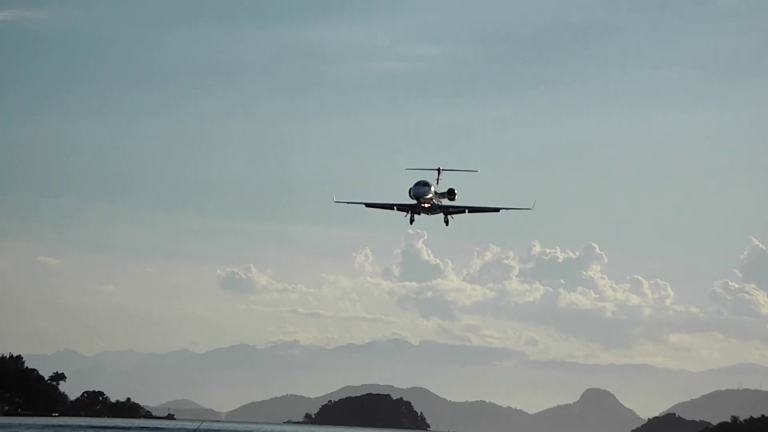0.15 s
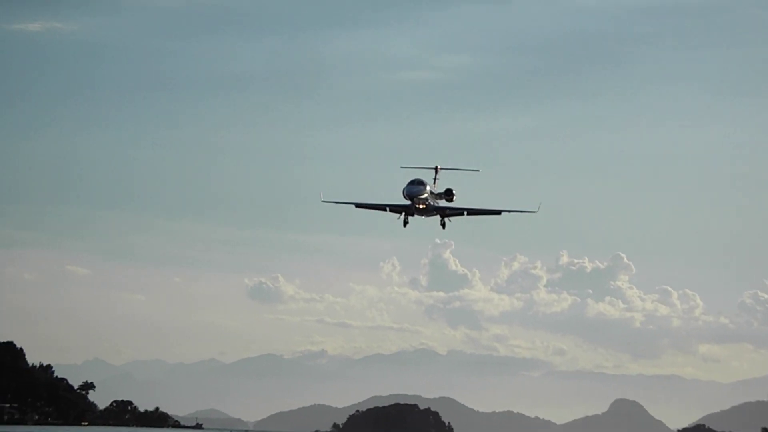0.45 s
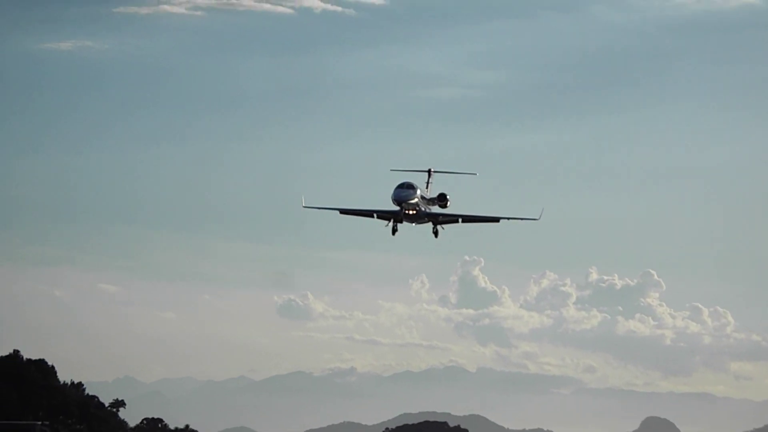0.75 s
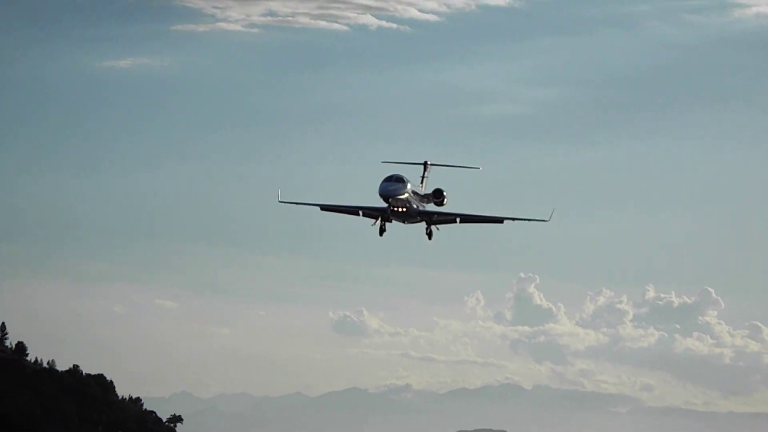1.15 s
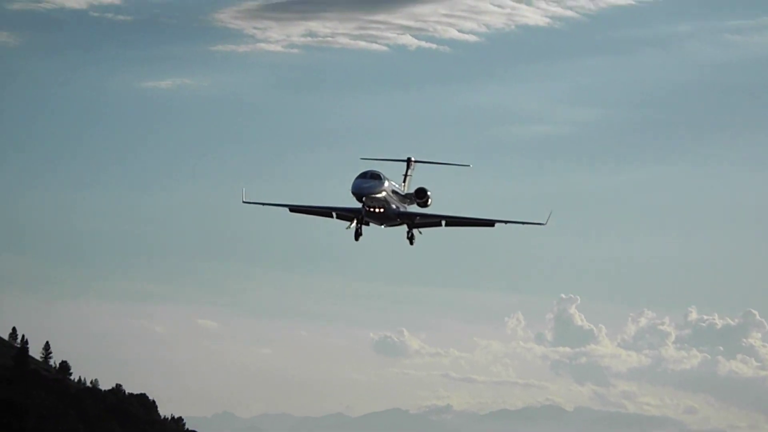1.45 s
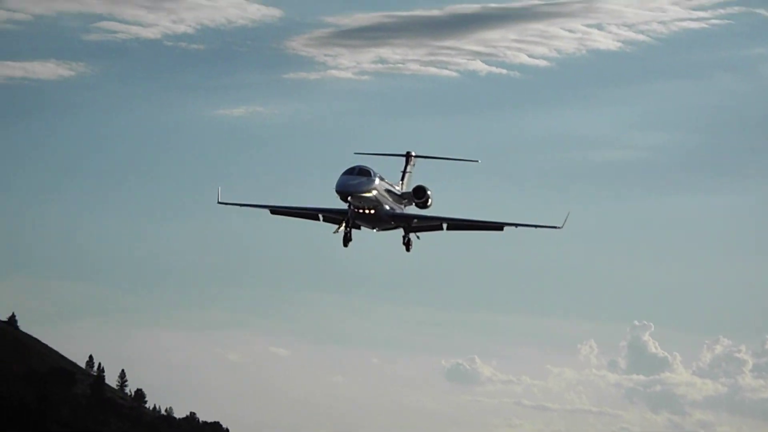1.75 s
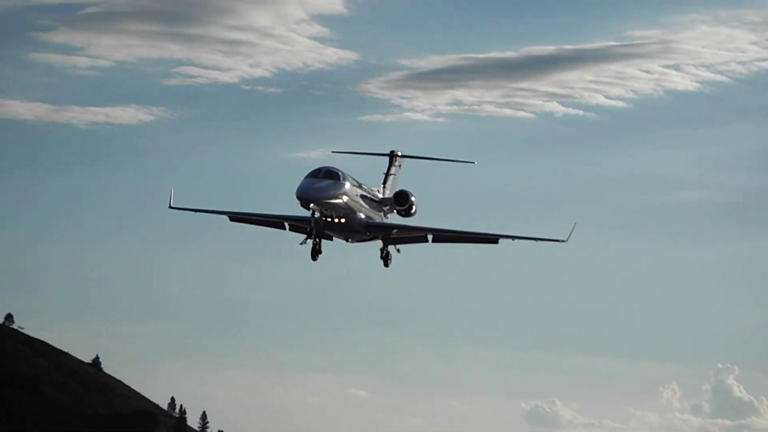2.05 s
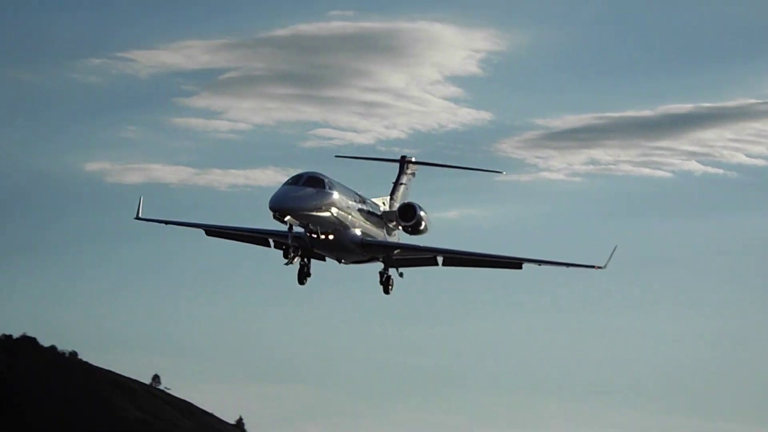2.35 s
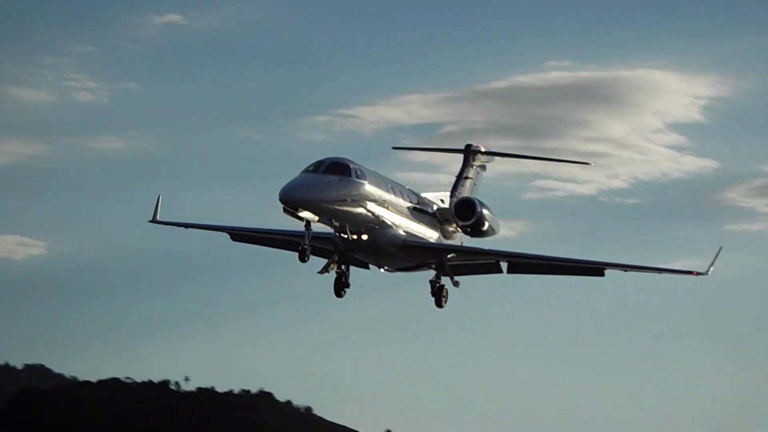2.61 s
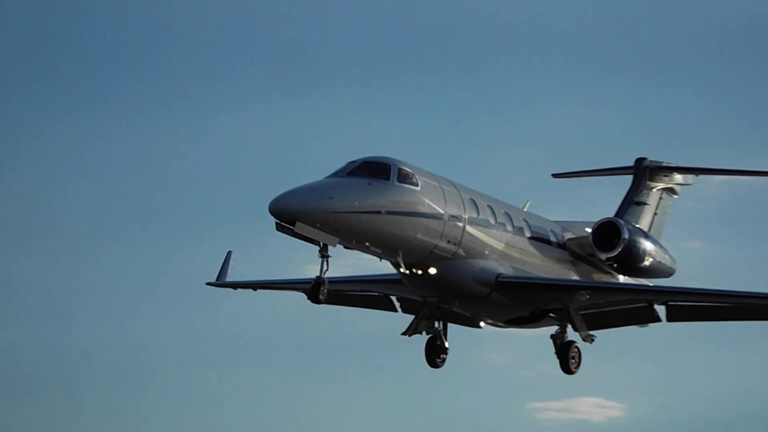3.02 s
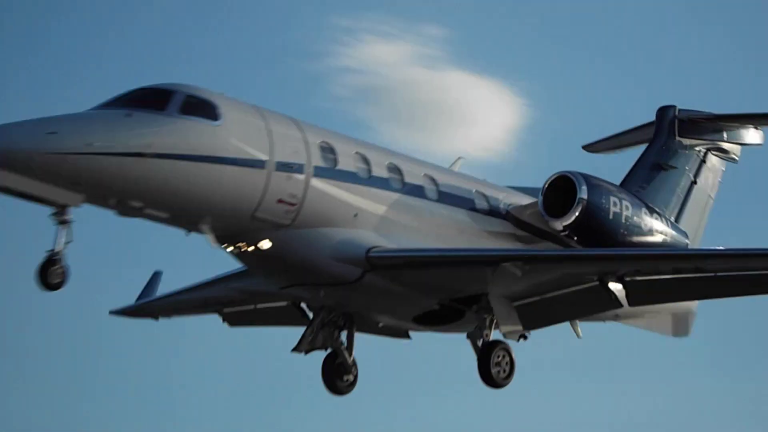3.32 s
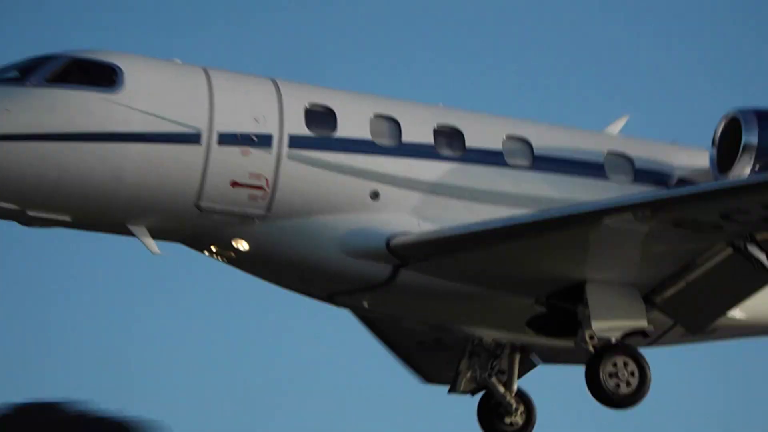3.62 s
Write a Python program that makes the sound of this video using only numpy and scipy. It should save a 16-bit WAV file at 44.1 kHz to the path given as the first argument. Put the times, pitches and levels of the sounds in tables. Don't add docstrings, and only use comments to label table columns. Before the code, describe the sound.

Small jet landing overhead outdoors: a steady rushing roar with sweeping hollow coloration, high turbine tones gliding down, then a brighter hissy pass with wavering whine, captured by overloaded camera microphones over barely audible surf.

```python
import sys
import numpy as np
from scipy import signal
from scipy.io import wavfile
from scipy.ndimage import uniform_filter1d, map_coordinates

SR = 44100
rng = np.random.default_rng(int(sys.argv[2]) if len(sys.argv) > 2 else 0)


def wrap_up_sound(samples):
    columns = np.atleast_2d(samples).T
    tamed = np.clip(columns, -1, 1)
    steps = np.round(tamed * 32767).astype(np.int16)
    wavfile.write(sys.argv[1], SR, steps)


def invert_db(x):
    u = np.asarray(x, float) / 20
    return 10 ** u


N = 166257

BOOSTER = 2.18
# time in seconds, fan blade rate in Hz, core rate in Hz.
SPOOLS = [(0, 2574, 4624), (.2, 2534, 4632), (.5, 2460, 4548), (1, 2292, 4466), (1.5, 2154, 4400),
          (1.92, 2047, 4328), (2.4, 1931, 4250), (2.9, 1832, 4150), (3.2, 1744, 4084), (3.4, 1706, 3964),
          (3.55, 1626, 3874), (3.66, 1575, 3733), (3.77, 1524, 3568)]


def unit(x):
    return x / np.sqrt(np.mean(x ** 2) + 1e-20)


def curves(rows):
    seconds, *columns = np.transpose(rows)
    t = np.arange(N) / SR
    return [np.interp(t, seconds, column) for column in columns]


def wobble(rate):
    knots = rng.standard_normal(int(N * rate / SR) + 4)
    return map_coordinates(knots, [np.arange(N) * rate / SR])


def along(points, hz):
    point_hz, value = np.transpose(points)
    return np.interp(np.log(hz + 1), np.log(point_hz + 1), value)


def shaped(x, gain_db):
    hz, seconds, bins = signal.stft(x, SR, nperseg=1024, noverlap=768)
    at = np.minimum((seconds * SR).astype(int), N - 1)
    bins = bins * invert_db(gain_db(hz[:, None], at))
    return signal.istft(bins, SR, nperseg=1024, noverlap=768)[1][:N]


def rush(spectrum, patchy_db):
    def gain_db(hz, at):
        patches = rng.standard_normal((len(hz), len(at)))
        patches = uniform_filter1d(patches, 12, 0)
        patches = uniform_filter1d(patches, 6, 1)
        return along(spectrum, hz) + patchy_db * unit(patches)

    return unit(shaped(rng.standard_normal(N), gain_db))


def tone(hz, flutter_db, rate, jitter_hz):
    heard_hz = hz + jitter_hz * wobble(60 + 2 * jitter_hz)
    phase = 2 * np.pi * np.cumsum(heard_hz) / SR
    flutter = invert_db(flutter_db * wobble(rate))
    return np.sqrt(2) * flutter * np.sin(phase) * (hz < SR / 2.5)


def off_ground(x):
    # time in seconds, extra ground path in ms, reflected share from 0 to 1.
    bounce = [(0, .75, .25), (.3, .82, .4), (.7, .93, .6), (1.1, 1.04, .5), (1.5, 1.18, .62),
              (1.9, 1.4, .4), (2.3, 1.68, .42), (2.7, 2.03, .42), (2.9, 2.29, .45), (3.1, 2.52, .3),
              (3.3, 3.1, .12), (3.77, 4.2, .08)]
    late_ms, share = curves(bounce)
    share = np.clip(share, 0, 1)
    dull = signal.filtfilt(*signal.butter(1, 9000, fs=SR), x)
    late_ms = late_ms + 0.023 * wobble(6.87)
    late = map_coordinates(dull, [np.arange(N) - late_ms * SR / 1000], order=3)
    return (x + share * late) / np.sqrt(1 + share ** 2)


def engine_roar():
    # time in seconds, intake level in dB, treble gain in dB near 12 kHz (below 0 is air loss),
    # exhaust level in dB.
    approach = [(0, -25.5, -12.5, -25), (.25, -20.5, -16.5, -22.5), (.5, -17.5, -20.5, -23.5),
                (.62, -12, -21, -23.5), (.8, -15.5, -13.5, -19), (.95, -12.5, -9, -18),
                (1.3, -12.5, -12.5, -17.5), (1.6, -13, -6, -21), (2, -14, -0.5, -20),
                (2.5, -17.5, 3.5, -19.5), (3, -16, 4, -20.5), (3.3, -17, 5.5, -20.5), (3.55, -19, 9, -25.5),
                (3.77, -23.5, 17.5, -20.5)]
    # frequency in Hz, density in dB per Hz.
    intake = [(1000, -31), (2500, -4), (4000, -3), (5500, 0), (6600, -5.5), (8100, -12.5), (11500, -26.5),
              (15600, -48.5)]
    # frequency in Hz, density in dB per Hz.
    exhaust = [(150, -49), (420, -14.5), (800, -5), (1350, -7), (1700, -2), (3000, -2.5), (6000, -5),
               (12000, -71)]
    intake_db, loss_db, exhaust_db = curves(approach)
    roar = invert_db(intake_db + 0.66 * wobble(14)) * rush(intake, patchy_db=1.5)
    roar = roar + invert_db(exhaust_db) * rush(exhaust, patchy_db=0.54)

    def path_db(hz, at):
        air_db = loss_db[at] * (hz / 11770.0) ** 1.61
        port_dip_db = -3 * np.exp(-((hz - 2840) / 340) ** 2)
        return air_db + port_dip_db

    return off_ground(shaped(roar, path_db))


def blade_tones():
    # fan multiple, core multiple, level in dB, best heard at in seconds,
    # beam width in seconds, pitch jitter in Hz.
    beams = [(1, 0, -30, .7, .65, 8), (1, 0, -29, 1.9, .3, 8), (0, 1, -28, 1.1, .7, 10),
             (0, 1, -28, 2.1, .35, 8), (BOOSTER, 0, -28, .75, .65, 60), (3, 0, -46, .3, .6, 8),
             (BOOSTER + 1, 0, -47, .3, .5, 8), (2, 1, -36, 2.6, 1.4, 14), (2, 1, -27, 3.7, .25, 40),
             (BOOSTER, 1, -43, 1.7, .95, 12), (3, 1, -68, 1, .4, 10), (BOOSTER + 1, 1, -60, 1.4, .45, 12),
             (BOOSTER + 2, 1, -63, 1.5, .55, 14), (BOOSTER + 3, 1, -64, 2.25, .35, 12),
             (1, 1, -18, 3.67, .2, 330)]
    fan, core = curves(SPOOLS)
    t = np.arange(N) / SR
    total = np.zeros(N)
    for fan_times, core_times, db, best_s, width_s, jitter_hz in beams:
        beam_db = np.maximum(-6 * ((t - best_s) / width_s) ** 2, -40)
        hz = fan_times * fan + core_times * core
        total += invert_db(db + beam_db) * tone(hz, flutter_db=2.6, rate=19, jitter_hz=jitter_hz)
    return total


def engines():
    return invert_db(0.29 * wobble(25.01)) * (engine_roar() + blade_tones())


def whine():
    # time in seconds, level in dB.
    whine_level = [(0, -43), (.9, -30), (1.9, -31), (2.05, -38), (2.11, -20), (2.25, -22), (2.33, -31),
                   (2.41, -15), (2.52, -29), (2.62, -18), (2.69, -30), (2.75, -19), (3.01, -24),
                   (3.18, -19), (3.29, -23), (3.4, -15), (3.56, -25), (3.77, -32)]
    fan, core = curves(SPOOLS)
    return invert_db(curves(whine_level)[0]) * tone(fan + core, flutter_db=2.2, rate=30, jitter_hz=5)


def airframe_hum():
    # time in seconds, frequency in Hz, level in dB.
    hum_glide = [(0, 483.5, -46), (.7, 476.3, -45), (1.5, 484.7, -48.5), (2.4, 479, -40),
                 (3.1, 469.7, -41.5), (3.4, 450.5, -50.5), (3.77, 427, -44)]
    hz, db = curves(hum_glide)
    return invert_db(db) * tone(hz, flutter_db=2.0, rate=11, jitter_hz=5.9)


def surf():
    # frequency in Hz, density in dB per Hz.
    wash = [(25, -37), (120, -16), (330, 4.5), (400, -6.5), (900, -6), (2000, -94)]
    # time in seconds, level in dB.
    wash_level = [(0, -44), (1.2, -43), (2, -51), (3.2, -51), (3.77, -42.5)]
    return invert_db(curves(wash_level)[0]) * rush(wash, patchy_db=2.5)


def port_wind():
    return invert_db(-76) * rush([(20, -4), (60, -8), (200, -43), (400, -92)], patchy_db=0.0)


def two_ports(near):
    # time in seconds, lean to the right from 0 to 1.
    lean = [(0, 0.7), (1.2, 0.73), (2.9, 0.2), (3.3, 0.16), (3.77, 0.3)]
    # frequency in Hz, side over mid in dB.
    side_over_mid = [(30, -14), (100, -24), (250, -30), (400, -18.5), (900, -34), (2500, -26.5),
                     (4400, -18), (8100, -13), (15000, -13)]
    scattered = signal.fftconvolve(near, rng.standard_normal(900) / 30)[:N]
    side = 0.9 * scattered - curves(lean)[0] * near
    side = shaped(side, lambda hz, at: along(side_over_mid, hz) + 0 * at)
    side = side + port_wind()
    return np.array([near + side, near - side])


def scene():
    return two_ports(engines() + whine() + airframe_hum() + surf())


def limiter(x):
    # time in seconds, duck depth in dB.
    peaks = [(0.879, 5), (0.98, 8), (1.095, 4.0), (1.154, 7), (1.191, 5.3), (1.249, 11), (1.296, 9),
             (1.323, 6.5), (1.56, 11), (1.632, 5.4), (1.701, 4), (1.819, 6), (1.84, 6), (1.996, -2),
             (2.054, 4.5), (2.237, 6), (2.331, 4), (2.444, 3.9), (2.515, 3), (2.818, 8), (2.858, 8.5),
             (2.889, 6.3), (3.022, 1), (3.087, 5.5), (3.143, 2), (3.218, 0), (3.259, 6.5), (3.463, 5.5),
             (3.513, 6.5), (3.609, 2)]
    recover_s, swell_s, swell_db = .011, .005, 1.5
    spike_db, spike_width_s, spike_hz = -11, .00022, 4500
    t = np.arange(N) / SR
    gain_db, spikes = np.zeros(N), np.zeros(N)
    for s, db in peaks:
        duck = -db * np.exp(-np.abs(t - s) / recover_s)
        swell = swell_db * np.exp(-np.abs(t - s) / swell_s)
        gain_db += np.where(t > s, duck, swell)
        u = (t - s + 0.00022) / spike_width_s
        envelope = np.exp(-np.minimum(u * u, 50))
        spikes += invert_db(spike_db) * envelope * np.cos(2 * np.pi * spike_hz * (t - s + 0.000268))
    return x * invert_db(uniform_filter1d(gain_db, size=31)) + spikes


def top_cut(x):
    return signal.sosfilt(signal.butter(12, 15610, fs=SR, output="sos"), x)


def record(dry):
    top, low_cut_hz = 1.25, 100
    x = limiter(dry)
    x = x / (1 + np.abs(x / top) ** 6) ** (1 / 6)
    x = signal.lfilter(*signal.butter(2, low_cut_hz, "high", fs=SR), x)
    return top_cut(x)


dry = scene()
out = record(dry)
wrap_up_sound(out)
```